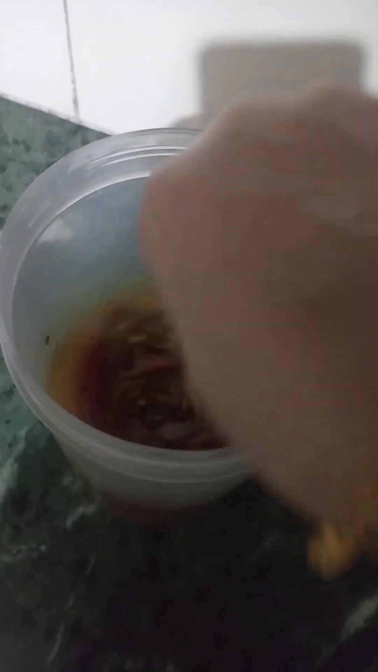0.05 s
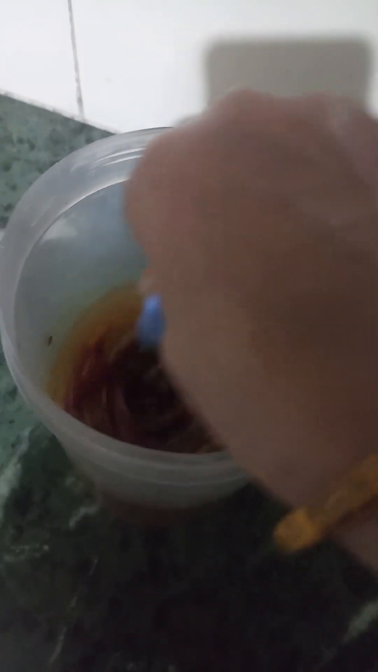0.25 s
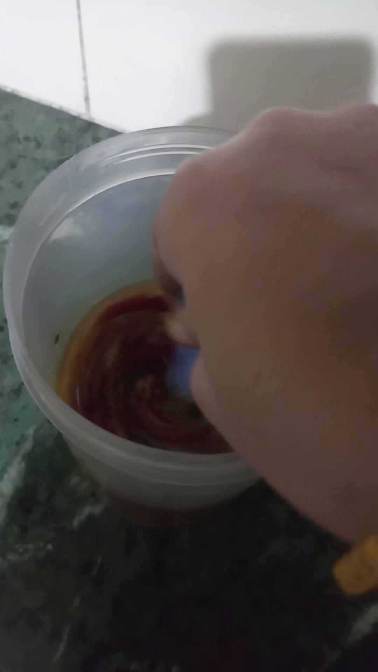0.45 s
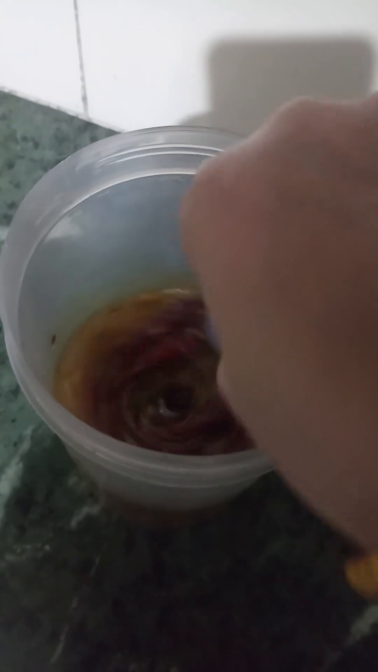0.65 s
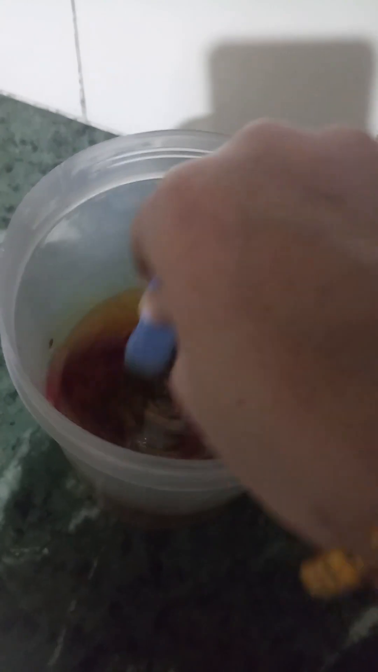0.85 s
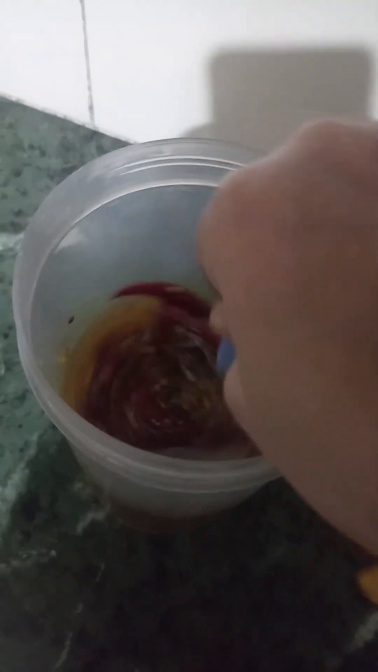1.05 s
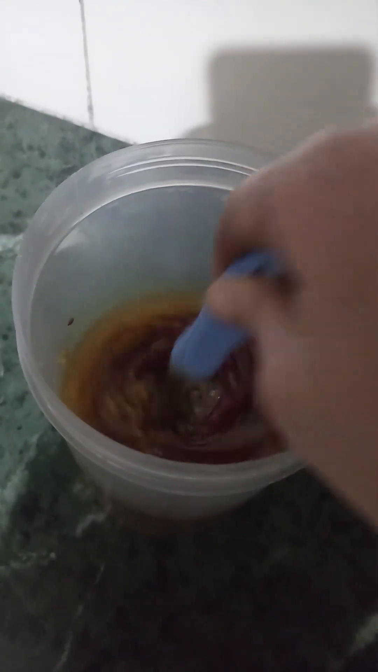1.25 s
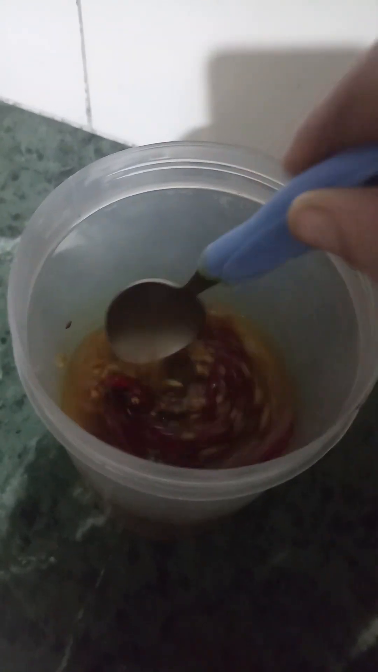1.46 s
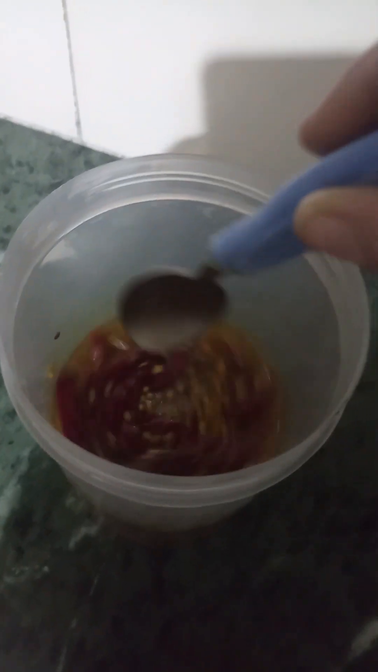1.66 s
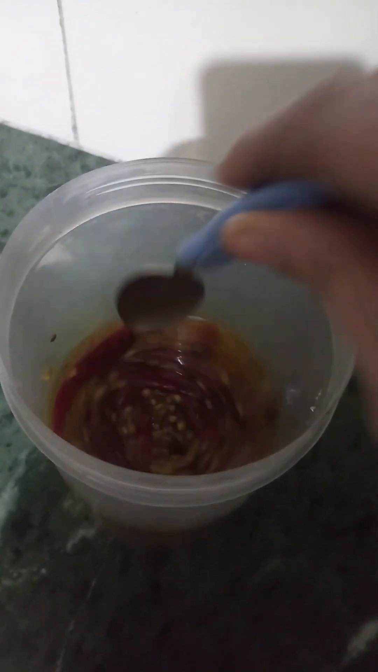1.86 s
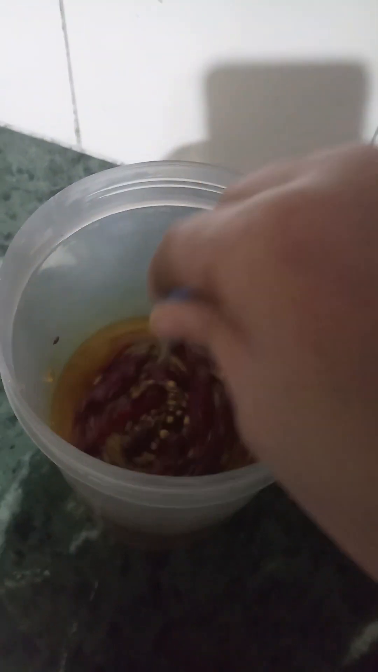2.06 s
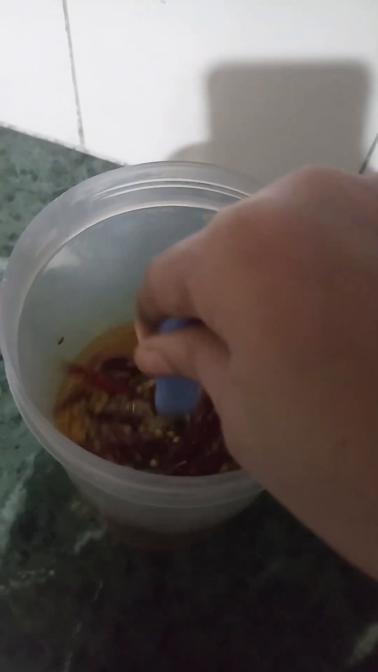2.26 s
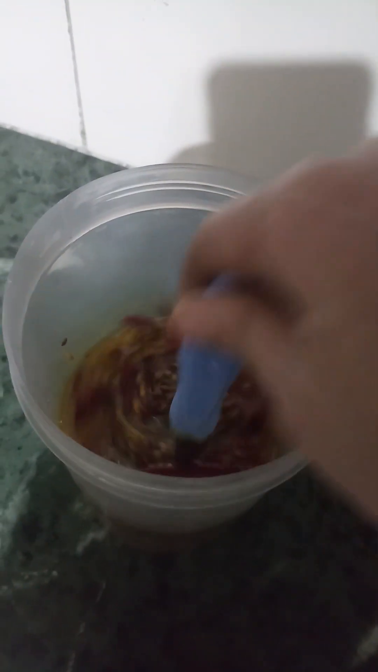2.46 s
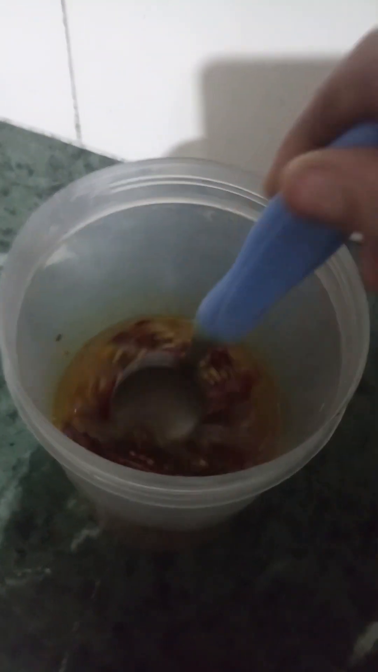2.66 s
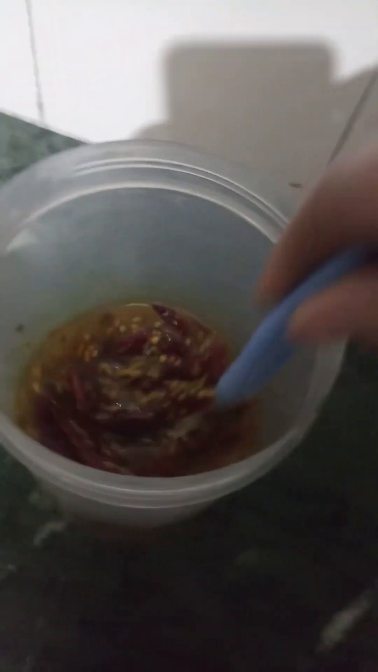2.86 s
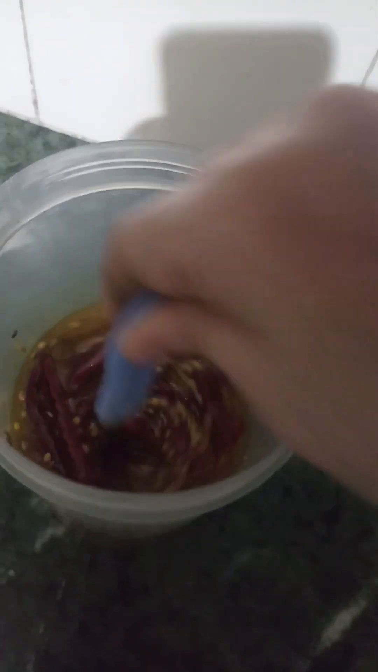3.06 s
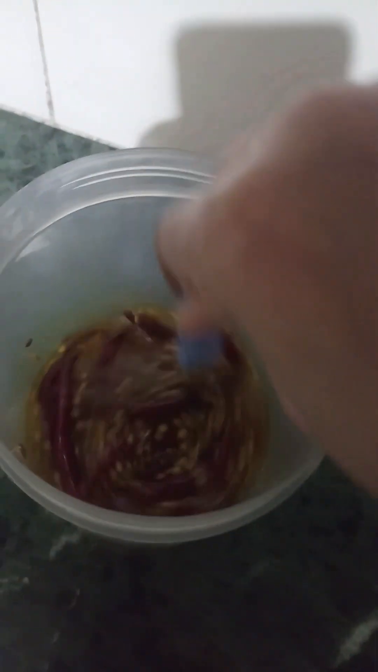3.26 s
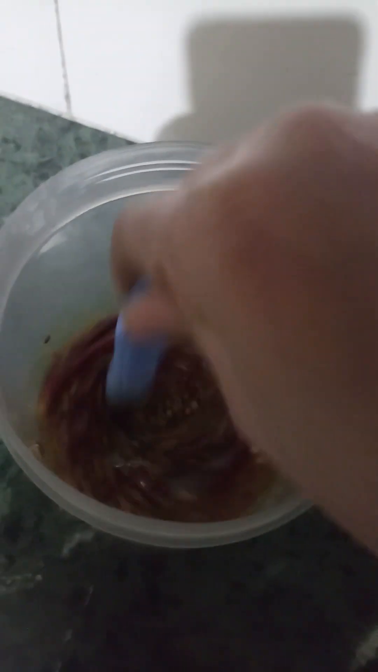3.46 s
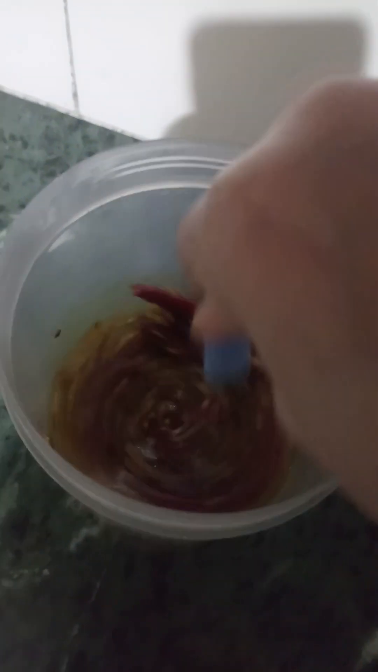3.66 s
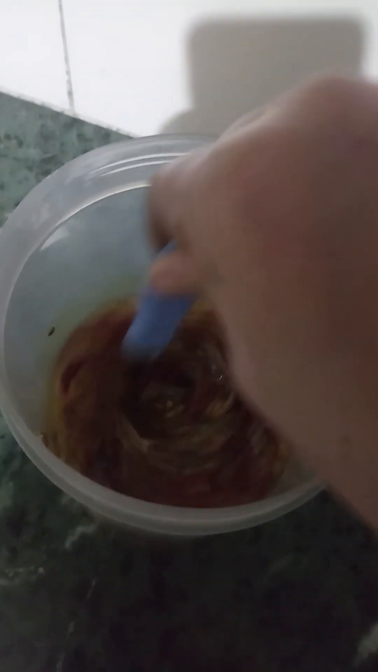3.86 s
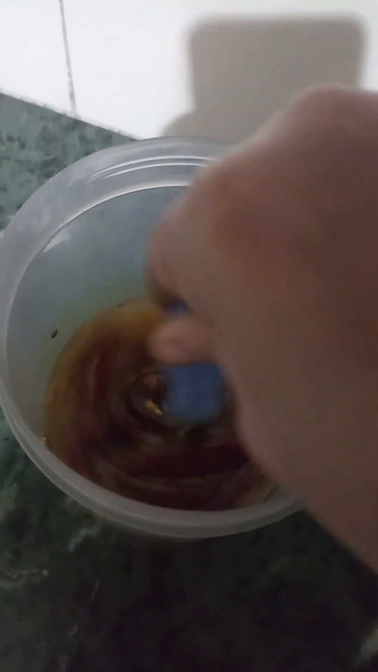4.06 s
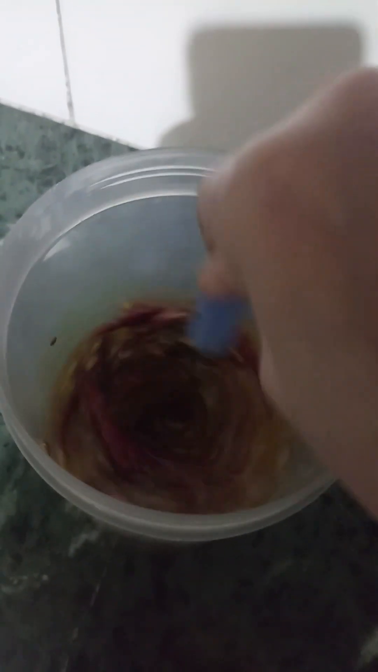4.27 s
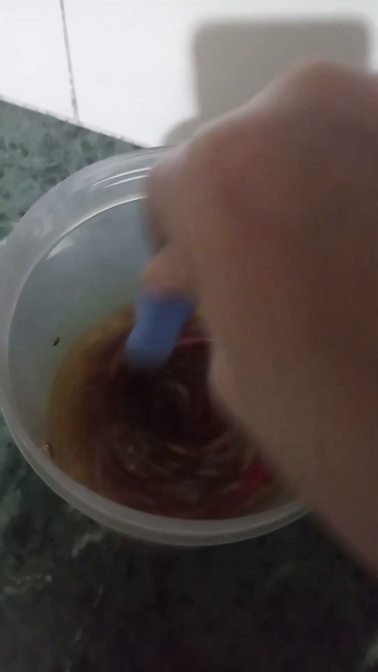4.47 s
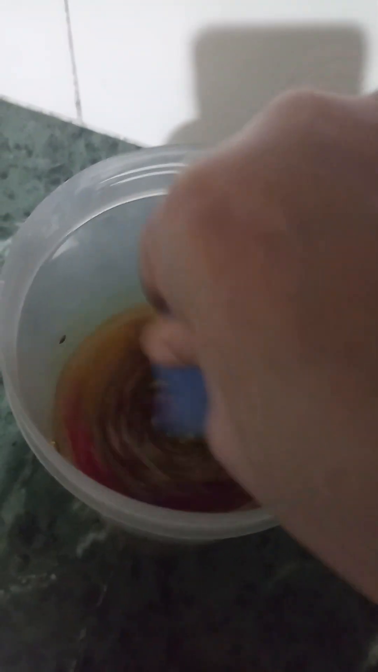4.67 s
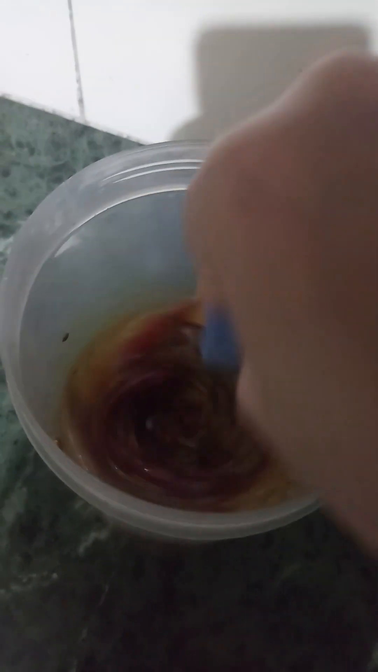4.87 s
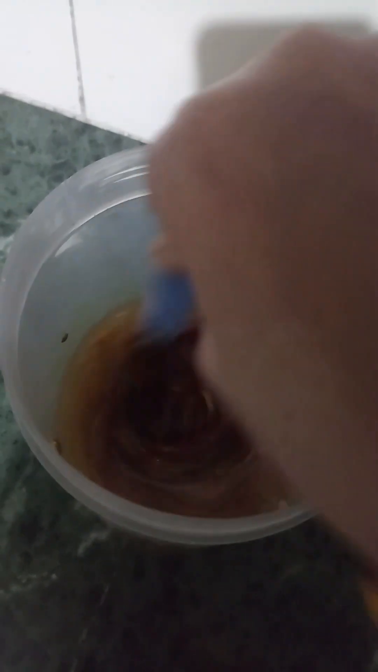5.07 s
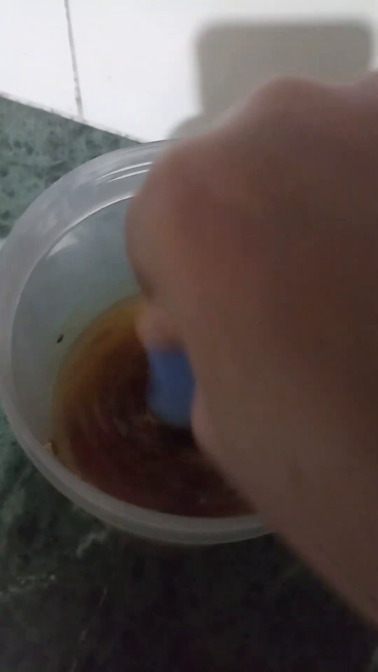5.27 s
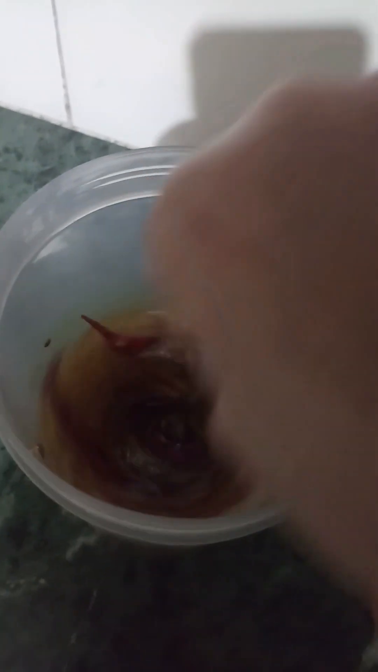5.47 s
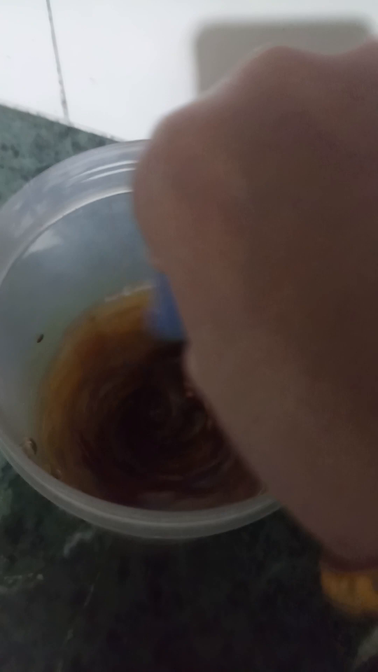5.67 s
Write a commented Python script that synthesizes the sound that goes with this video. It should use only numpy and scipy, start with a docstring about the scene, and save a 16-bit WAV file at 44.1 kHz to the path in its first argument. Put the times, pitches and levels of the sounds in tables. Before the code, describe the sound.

Uneven hollow plastic knocks with a short steely edge sit over crunchy scraping and wet, bubbly hiss. Stirring opens busily, eases while the spoon is lifted, resumes near two seconds and becomes vigorous, ending in a tight cluster of blows. Soft gulps and low thuds appear underneath. Close small microphone, quiet hard-walled room with short reflections.

```python
"""Uneven knocks and gritty scraping: a steel spoon stirs salt and whole spices in a thin plastic tub.
Each knock mixes fading tones of tub, spoon and room with bursts of noise; grazes are made the same way.
Scraping is made of random clicks sent through resonances, getting louder and softer with the strokes.
Behind it are bubbly hiss, short hollow tones of gulping or slapping liquid, one clink, low thuds,
a small hard room and a quiet kitchen."""
import sys
import numpy as np
from scipy import signal
from scipy.fft import rfft, irfft
from scipy.io import wavfile

SR = 44100
rng = np.random.default_rng(int(sys.argv[2]) if len(sys.argv) > 2 else 0)


def persist_wave(psi):
    """Save psi, clipped to +-1, as 16-bit WAV."""
    counts = np.round(np.clip(psi, -1, 1) * 32767).astype(np.int16)
    wavfile.write(sys.argv[1], SR, np.atleast_2d(counts).T)


N = 252252
TIME = np.arange(N) / SR  # seconds
# tone colour of the gritty scraping as the microphone hears it, also used for the fine fizz:
# (frequency [Hz], level [dB])
SCRAPE_COLOUR = [(150, -2), (450, 1), (900, -9), (1500, -9.5), (2700, -3.5), (6800, -7.5), (7800, -18.5),
                 (9200, -53.5), (15000, -33.5)]


def from_db(db):
    """Turn decibels into a gain, the number a sound is multiplied by."""
    return 10 ** (np.asarray(db) / 20)


def rms_one(x):
    """Scale a signal to an average power of one."""
    return x / np.sqrt(np.mean(x ** 2) + 1e-20)


def at_hz(points, hz):
    """Read between the points of a (frequency [Hz], value) table, with frequency on a log scale."""
    knots, values = np.transpose(points)
    return np.interp(np.log(hz + 1e-9), np.log(knots), values)


def colour(x, spectrum):
    """Make each frequency louder or softer, as a (frequency [Hz], level [dB]) table says."""
    gain = from_db(at_hz(spectrum, np.fft.rfftfreq(len(x), 1 / SR)))
    return irfft(rfft(x) * gain, len(x))


def filtered(x, order, hz, kind="low"):
    """Keep only the lows, the highs or a band of a sound with a smooth filter."""
    return signal.sosfilt(signal.butter(order, hz, kind, fs=SR, output="sos"), x)


def drift(rate):
    """Wander at random through `rate` new values a second, with a typical size of one."""
    knots = rng.standard_normal(4096)
    return rms_one(np.interp(TIME * rate, np.arange(len(knots)), knots))


def resonate(x, modes):
    """Make resonances ring; filtering twice keeps the gaps between them dark."""
    out = 0
    for hz, width, db in modes:
        b, a = signal.iirpeak(hz, hz / (2 * width), fs=SR)
        once = signal.lfilter(b, a, x)
        twice = signal.lfilter(b, a, once)
        out = out + from_db(db) * rms_one(twice)
    return out


def fade(t, t60, rise):
    """Build up over about `rise` seconds and die away by 60 dB every `t60` seconds."""
    return (1 - np.exp(-t / rise)) * from_db(-60 * t / t60)


def add(out, s, sound):
    """Mix a sound in, starting at s seconds."""
    start = max(round(s * SR), 0)
    out[start:start + len(sound)] += sound[:N - start]


def grains(per_s, spread_db, clump_db):
    """Random clicks of uneven size that come in clumps, scaled to a power of one."""
    sizes = from_db(spread_db * np.minimum(rng.exponential(1, N), 4.5)) * rng.choice([-1, 1], N)
    happens = rng.random(N) < per_s / SR
    return rms_one(sizes * happens * from_db(clump_db * drift(70)))


def still_kitchen(floor_db=-58):
    """The quiet room: steady noise with the tone colour of a still kitchen."""
    # tone colour of the room noise: (frequency [Hz], level [dB])
    room_colour = [(55, -13), (90, 2), (150, -11), (220, -23.5), (600, -25.5), (1200, -36), (3000, -45.5),
                   (7000, -39.5), (9500, -51.5), (12000, -43.5), (15500, -42)]
    return from_db(floor_db) * rms_one(colour(rng.standard_normal(N), room_colour))


def kitchen_echo(x, t60=0.32, bass_t60=0.6, build_up=0.0023):
    """Dense echoes off tiles and counter, made from fading noise; the bass lingers longer."""
    t = TIME[:SR * 2 // 3]
    echoes = rng.standard_normal(len(t))
    bass = filtered(echoes, 2, 450)
    tail = (echoes - bass) * fade(t, t60, build_up) + bass * fade(t, bass_t60, build_up)
    return signal.fftconvolve(x, tail / np.sqrt(np.sum(tail ** 2)))[:N]


def thuds(cycles=13.0):
    """Soft, rough low bumps: a low tone plus low noise, 60 dB down after a few cycles."""
    # bumps: (time [s], level [dB], pitch [Hz])
    bumps = [(0.804, -31.5, 112), (0.825, -33, 169), (0.883, -29.5, 93), (5.13, -28, 131), (5.236, -33, 86),
             (5.311, -38, 122)]
    out, t = np.zeros(N), TIME[:SR // 4]
    for s, db, hz in bumps:
        rumble = rms_one(filtered(rng.standard_normal(len(t)), 2, hz))
        bump = np.sin(2 * np.pi * hz * t) + rumble / 2
        add(out, s, from_db(db) * bump * fade(t, cycles / hz, .5 / hz))
    return out


def gulps_and_slaps(glide=0.42):
    """Short soft hollow tones, as liquid gulps or slaps the tub wall; each rises slightly in pitch."""
    # hollow tones: (time [s], starting pitch [Hz], level [dB], time to fade by 60 dB [s])
    hollow_tones = [(0.141, 240, -24.5, 0.12), (1.301, 620, -39.5, 0.08), (2.706, 608, -35, 0.14),
                    (2.778, 630, -36, 0.15), (3.812, 334, -27, 0.23), (4.091, 593, -29.5, 0.12),
                    (5.2524, 601, -21.5, 0.086), (5.419, 277, -25.5, 0.12), (5.43, 211, -19, 0.12)]
    out, t = np.zeros(N), TIME[:SR // 4]
    for s, hz, db, t60 in hollow_tones:
        tone = np.sin(2 * np.pi * hz * t * (1 + glide * t))  # pitch grows by 2 * glide of itself a second
        add(out, s, from_db(db) * tone * fade(t, t60, 1 / hz))
    return out


def swells(rows):
    """Smooth bell-shaped rises of level, added together."""
    return sum(from_db(db) * np.exp(-.5 * ((TIME - s) / length) ** 2) for s, db, length in rows)


def swishes(low_hz=5500):
    """A fine, airy fizz in the treble as the spoon cuts through the brine, leaves it or slides back in."""
    # fizzes: (time of the peak [s], level [dB], spread of the bell around its peak [s])
    fizzes = [(0.765, -58, 0.0085), (1.083, -45.5, 0.0033), (1.47, -63.5, 0.061), (1.79, -57, 0.1),
              (2.77, -54, 0.032), (4.05, -47.5, 0.006), (4.26, -46.5, 0.024), (4.414, -50, 0.003)]
    hiss = colour(rng.standard_normal(N), SCRAPE_COLOUR)
    return swells(fizzes) * rms_one(filtered(hiss, 2, low_hz, "high"))


def push(start, length):
    """Effort of one stroke in dB: it builds up, holds and lets go into a slowly dying swirl."""
    attack, release = 302, 197.5  # dB per second
    swirl_db, swirl_fade = -4.5, 42  # the mixture swirls on this much softer, fading in dB per second
    before = np.maximum(start - TIME, 0)
    after = np.maximum(TIME - start - length, 0)
    return np.maximum(-release * after, swirl_db - swirl_fade * after) - attack * before


def stirring():
    """Levels of grinding and of rubbing in dB; the strongest stroke of the moment sets each."""
    # pushes whose bowl grinds salt and whose back rubs the wall:
    # (start [s], length [s], grinding level [dB], rubbing level [dB])
    strokes = [(0.0, 0.28, -49.5, -41), (0.39, 0.23, -51.5, -49), (0.707, 0.38, -51, -50),
               (1.17, 0.077, -62, -47), (1.883, 0.14, -55, -44), (2.217, 0.25, -51.5, -45.5),
               (2.768, 0.028, -47, -39), (3.13, 0.86, -53.5, -48), (3.431, 0.2, -45.5, -41),
               (3.749, 0.24, -48.5, -43.5), (4.052, 0.26, -54.5, -44), (4.195, 0.14, -49.5, -40.5),
               (4.503, 0.034, -48.5, -39), (4.752, 0.18, -57, -45), (5.121, 0.12, -45, -40),
               (5.324, 0.11, -52.5, -38.5), (5.671, 0.025, -45, -35.5)]
    levels = [push(start, length) + [[grind_db], [rub_db]] for start, length, grind_db, rub_db in strokes]
    return np.max(levels, axis=0)


def froth(low_hz, splash_db, high_hz=7200, splashes_per_s=40, count=6):
    """Tiny bubbles burst in small splashes, now lower, now higher in the treble; power of one."""
    edges, out = np.geomspace(low_hz, high_hz, count + 1), 0
    for band in zip(edges, edges[1:]):
        fizz = filtered(grains(per_s=1500, spread_db=1.0, clump_db=2.5), 2, band, "band")
        splashes = from_db(splash_db * np.minimum(drift(splashes_per_s), 2))
        out = out + rms_one(fizz) * splashes
    return rms_one(out)


def wash(level_db=-5.5):
    """The brine parts around the spoon: a wet hiss that follows the strokes."""
    grinding, _ = stirring()
    return from_db(level_db + grinding) * froth(low_hz=2630, splash_db=10)


def clink(s=1.87):
    """The bare bowl of the spoon rings freely once, as it comes back down."""
    # free ringing of the steel: (pitch [Hz], level [dB], time to fade by 60 dB [s])
    steel_tones = [(5470, -18.5, 0.02), (5700, -22.5, 0.0098)]
    out, t = np.zeros(N), TIME[:SR // 4]
    for hz, db, t60 in steel_tones:
        add(out, s, from_db(db) * np.sin(2 * np.pi * hz * t) * fade(t, t60, 1 / hz))
    return out


def spice_ticks(per_s=60, range_db=13, t60=0.011):
    """At uneven moments a hard seed is flicked against the wall: a short burst of noise."""
    count = int(per_s * N / SR)
    swell, t = np.zeros(N), TIME[:SR // 20]
    for k, (when, size) in enumerate(rng.random((count, 2))):
        add(swell, (k + when) / per_s, from_db(range_db * size - 60 * t / t60))
    return swell * rng.standard_normal(N)


def flutter(x, depth_s=0.00036, per_s=28):
    """The sloshing level shifts a resonance up and down: the sound is read slightly early or late."""
    return np.interp(TIME + depth_s * drift(per_s), TIME, x)


def scrape(tick_share=0.27, catch_db=1.5):
    """Salt and seeds crack under the spoon and set it ringing; its stick and slip makes the tub hum."""
    # resonances under the dragging spoon: (pitch [Hz], half the width of one filter pass [Hz], level [dB])
    rub_tones = [(352.4, 34, -18.5), (593.8, 32, -4.5), (631.7, 29, -11.5)]
    # resonances of the spoon grinding salt, same columns: (pitch [Hz], half width [Hz], level [dB])
    grind_tones = [(2055, 175, -3), (1940, 210, -14.5)]
    grinding, rubbing = stirring()
    salt = grains(per_s=2400, spread_db=2.0, clump_db=5.0)
    crunch = salt + tick_share * rms_one(spice_ticks())
    # the spoon catches and lets go, so its ring comes and goes
    bite = rms_one(from_db(catch_db * np.clip(drift(19), -2, 2)))
    grind = rms_one(colour(crunch, SCRAPE_COLOUR)) + resonate(salt * bite, grind_tones)
    rub = flutter(resonate(grains(per_s=620, spread_db=2.5, clump_db=3.5), rub_tones))
    return from_db(grinding) * grind + from_db(rubbing) * rub


def knock(force_db, bright_db, spoon_db, base_db, wall_db, hollow_db,
          detune=0.01, uneven_db=2.67, rise_cycles=3.45,  # random pitch share, random level, build-up of tones
          snap_db=9.0, snap_t60=0.018, rattle_db=-10.0, rattle_t60=0.21,
          slop_db=-14.5, slop_t60=0.25, ragged_db=5.0, crunch_per_s=3500):
    """One blow: a sharp crack, a gritty clatter, fading tones of tub, spoon and room, and a wet thud."""
    # centres of base, wall, hollow, spoon, crack and edge: one column (frequency [Hz])
    part_hz = [160, 340, 610, 2080, 3500, 6000]
    # tones of tub and spoon, and a low hum of the room that knocks set off:
    # (pitch [Hz], level [dB], time to fade by 60 dB [s])
    knock_tones = [(76.8, -14.5, 0.49), (154.8, -2, 0.15), (218.7, -7, 0.21), (294, 4.5, 0.065),
                   (341.7, 6, 0.15), (405.5, 2.5, 0.068), (595.3, 7.5, 0.071), (645.6, -0.5, 0.065),
                   (872.6, -13.5, 0.056), (1854, -9.5, 0.037), (2080, 10.5, 0.023), (2167, 9, 0.0094),
                   (4480, -4, 0.042)]
    # tone colour of the crack as the microphone hears it: (frequency [Hz], level [dB])
    crack_colour = [(150, -24), (400, 1), (1000, 0), (1600, -3.5), (3100, 2.5), (4500, 2), (6800, 6),
                    (7800, -7), (9300, -35.5), (12000, -31)]
    # band of the wet thud under a blow: lower and upper limit [Hz]
    slop_band = [230, 843]
    medium_blow_db = -20
    medium_crack_db, medium_edge_db, medium_clunk_db = -22, -33, -21  # levels at a medium blow
    growth = 1  # crack and edge grow by this many dB per dB of force
    bright_edge_share = 0.41  # share of the brightness that is added to the edge
    wall_bend, wall_settle_s = 0.041, 0.018  # a medium blow sharpens the wall by up to this share; it settles

    t = TIME[:SR // 3]
    harder = force_db - medium_blow_db
    crack_db = medium_crack_db + growth * harder
    edge_db = medium_edge_db + growth * harder + bright_edge_share * bright_db
    part_db = [force_db + base_db, force_db + wall_db, force_db + hollow_db, force_db + spoon_db,
               crack_db, edge_db]
    strength = list(zip(part_hz, part_db))
    # the bend is greatest at the wall's centre and gone at base and hollow
    stretch = list(zip(part_hz, [0, wall_bend * from_db(harder), 0]))

    out = 0
    for k, (hz, db, t60) in enumerate(knock_tones):
        # pitch and level differ a little each time, as the swirling liquid loads the wall
        load, share = rng.standard_normal(2)
        pitch = hz * (1 + detune * load + at_hz(stretch, hz) * np.exp(-t / wall_settle_s))
        direction = (-1) ** k  # neighbouring tones start in opposite directions
        ring = direction * np.sin(2 * np.pi * np.cumsum(pitch) / SR) * fade(t, t60, rise_cycles / hz)
        out = out + from_db(db + at_hz(strength, hz) + uneven_db * share) * ring

    # the low middle of the crack follows force and hollow, the top follows crack and edge
    clunk = (2 * part_hz[2], medium_clunk_db + harder + hollow_db / 2)

    def crack_sound(x):
        """Give noise the tone colour of the crack at this blow's strength."""
        return colour(rms_one(colour(x, crack_colour)), [clunk] + strength[-2:])

    snap = crack_sound(rng.standard_normal(len(t)))
    # the liquid slops against the wall that has just been pushed
    slop = rms_one(filtered(rng.standard_normal(len(t)), 3, slop_band, "band"))
    slop_level = from_db(slop_db + force_db + (wall_db + hollow_db) / 2)
    out = out + slop_level * slop * fade(t, slop_t60, 2 / part_hz[1])
    # the spoon skids on over trapped salt, so the tail is grainy and dies unevenly
    chatter = rms_one(from_db(ragged_db * np.minimum(drift(160)[:len(t)], 2)))
    crunches = rng.standard_normal(len(t)) * (rng.random(len(t)) < crunch_per_s / SR)
    clatter = chatter * crack_sound(crunches)
    out = out + from_db(snap_db) * snap * fade(t, snap_t60, 0.0013)
    return out + from_db(rattle_db) * clatter * fade(t, rattle_t60, 0.0026)


def knocks():
    """Every touch of the spoon on the tub, the firm blows and the light grazes."""
    # firm blows; the spot that is hit sets how much each part answers, relative to the force, and the
    # spoon's rim is brighter than its back: (time [s], force [dB], wall [dB], spoon [dB], base [dB],
    # hollow [dB], brightness [dB])
    blows = [(0.068, -22.5, -10.5, -2.5, -7, -4, 0), (0.1379, -21.5, 0, 1.5, -4, 10, -8),
             (0.2338, -21.5, -2.5, -1.5, -11, -10, -14.5), (0.3942, -28, -12, -2, -22, -16, -15),
             (0.5809, -23, -13, -4.5, -6.5, -8.5, -10), (0.696, -46, 10, 4, -20, 7.5, -6),
             (0.8538, -27, 0, 0.5, 1, -9, -9), (1.8508, -20, -10, -5, -12, -22, 1),
             (1.8686, -26.5, -26, -4, -13, -13.5, 15), (1.93, -33, -17, 3, -10, -4, 28),
             (2.146, -18, -11, -1.5, -3, -6.5, -2), (2.3851, -12, -17, -4, -20.5, -1, -6.5),
             (2.4078, -22, -6.5, -5.5, -29, 9.5, -10), (2.8776, -14.5, -15, -10.5, -14.5, -13.5, -6),
             (3.2616, -15, -13, -2.5, -15, -10.5, 3), (3.4443, -15, -14.5, -3.5, -29, -1.5, -5.5),
             (3.5008, -27.5, -7, -12, -9, 1.5, -4), (3.685, -14, -14, 1, -15.5, -7.5, 8.5),
             (3.7616, -28.5, 0, -5, -4, -6, -11), (4.2093, -24.5, -3, 3.5, -9.5, -3.5, 5),
             (4.5791, -21, -9, -3, -2.5, -6, 3.5), (4.6641, -10.5, -22.5, -4.5, -21, -11.5, -2),
             (4.868, -22, -8.5, 5.5, -2.5, -5, 0.5), (4.997, -12.5, -7, -1.5, -22.5, 2, -23),
             (5.0178, -27.5, -15.5, 5, -23, 4.5, 3), (5.147, -19, -13.5, -4, -1, -10.5, -11),
             (5.1788, -24, -10, 0, -17, -6, 0), (5.3635, -30.5, -2, 1.5, -6, 0, -2),
             (5.418, -23, -3, -3.5, -5, -4, -8), (5.491, -14.5, -13.5, 0.5, -6.5, -6, 7)]
    # grazes of the wall: (time [s], force [dB], brightness [dB])
    grazes = [(0.112, -25.5, 8.5), (1.1479, -37.5, -7), (1.717, -52, -22.5), (2.022, -54, -16),
              (2.2842, -34, 0), (2.325, -33, 15), (2.5081, -31.5, 1.5), (3.6358, -31.5, -4),
              (3.8891, -40, -6), (3.9222, -30, -5), (4.014, -40, -18.5), (4.195, -34.5, 22),
              (4.9208, -39, -14), (5.1141, -30.5, 8), (5.426, -24, 0), (5.4416, -31, 22),
              (5.695, -33.5, -17)]
    body_db, graze_spoon_db = -17.5, -4  # the tub hardly answers a graze, the spoon a little
    out = np.zeros(N)
    for s, force_db, wall_db, spoon_db, base_db, hollow_db, bright_db in blows:
        add(out, s, knock(force_db, bright_db, spoon_db, base_db, wall_db, hollow_db))
    for s, force_db, bright_db in grazes:
        spoon_db = graze_spoon_db - bright_db / 2  # a bright graze rings less
        add(out, s, knock(force_db, bright_db, spoon_db, body_db, body_db, body_db))
    return out


def scene(room_db=-12.0):
    """The tub close by, its echo, the low thuds and the quiet room."""
    tub = knocks() + clink() + scrape() + wash() + swishes() + gulps_and_slaps()
    echo = from_db(room_db) * kitchen_echo(tub)
    return (tub + echo + thuds() + still_kitchen())[None]


def record(dry, bass_cut_hz=38, cutoff_hz=15900):
    """The small microphone loses the deep bass; the top is cut steeply."""
    thin = filtered(dry, 2, bass_cut_hz, "high")
    return signal.sosfilt(signal.ellip(10, .1, 80, cutoff_hz, fs=SR, output="sos"), thin)


dry = scene()
out = record(dry)
persist_wave(out)
```